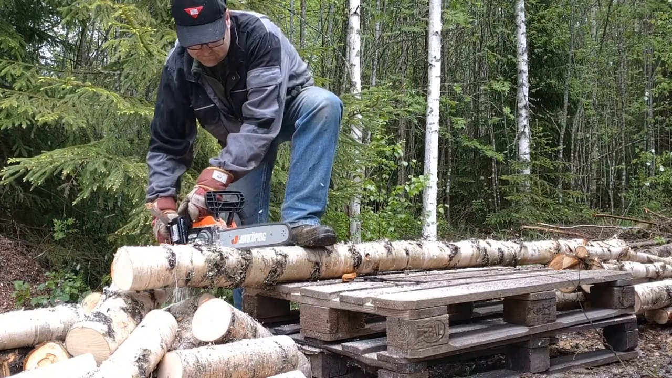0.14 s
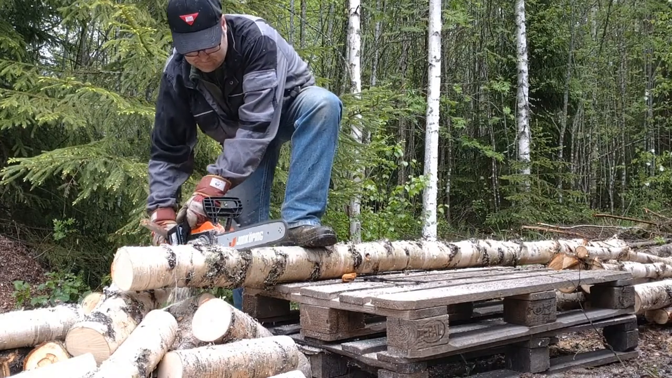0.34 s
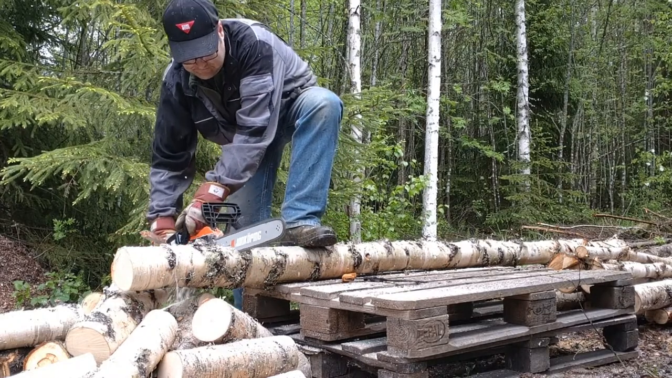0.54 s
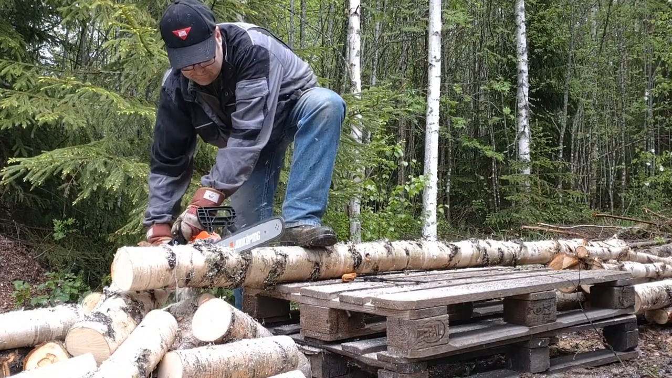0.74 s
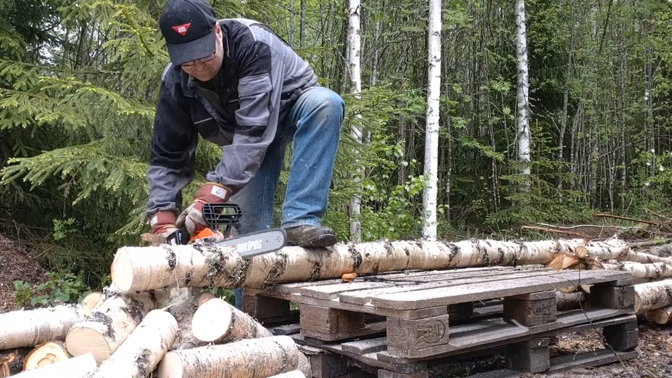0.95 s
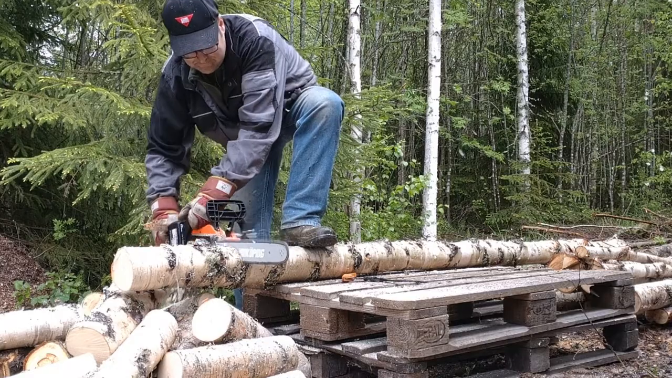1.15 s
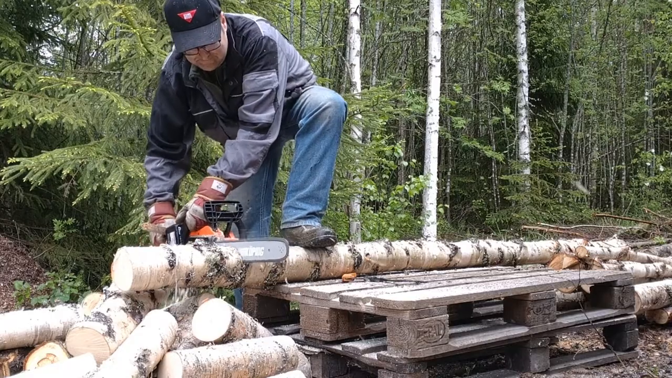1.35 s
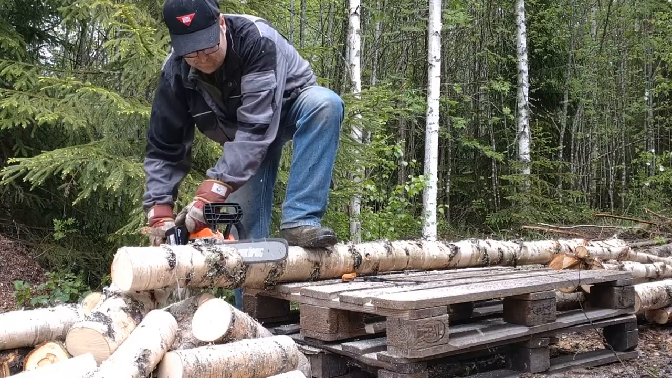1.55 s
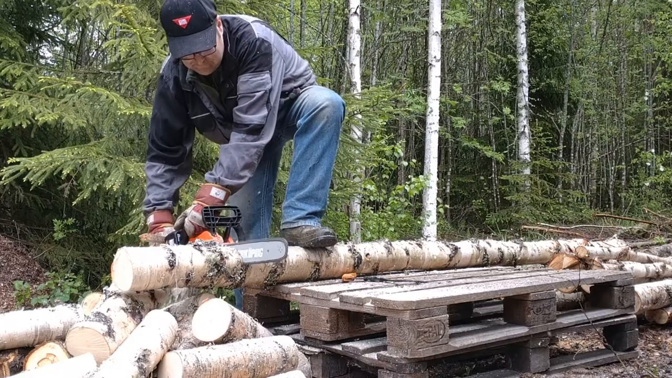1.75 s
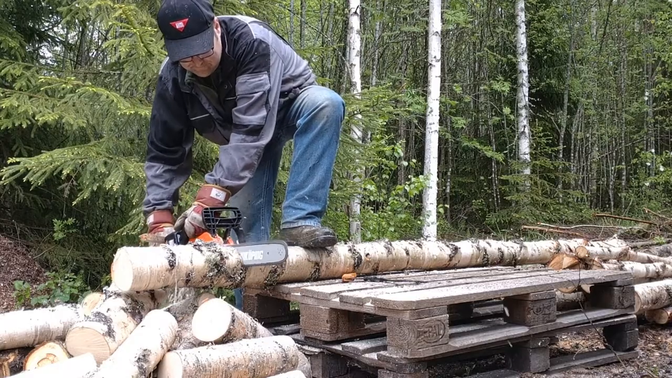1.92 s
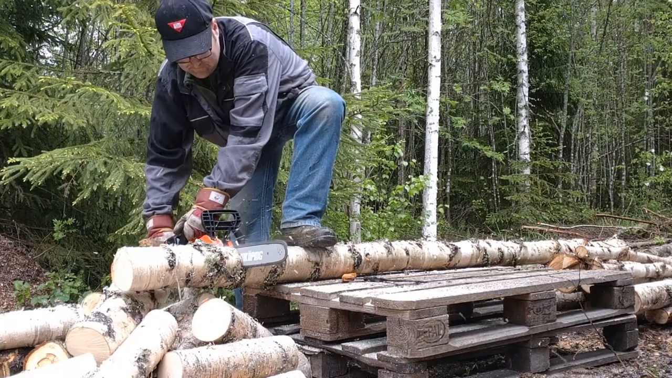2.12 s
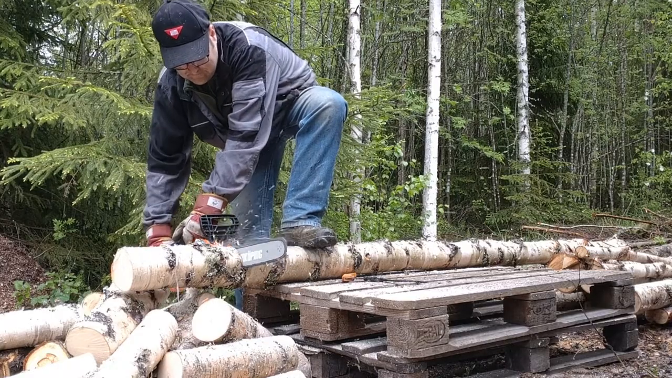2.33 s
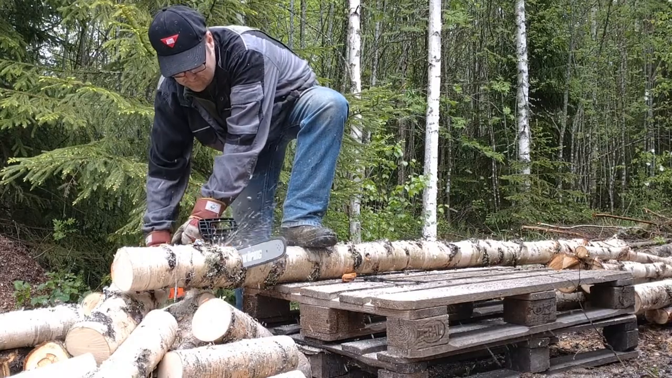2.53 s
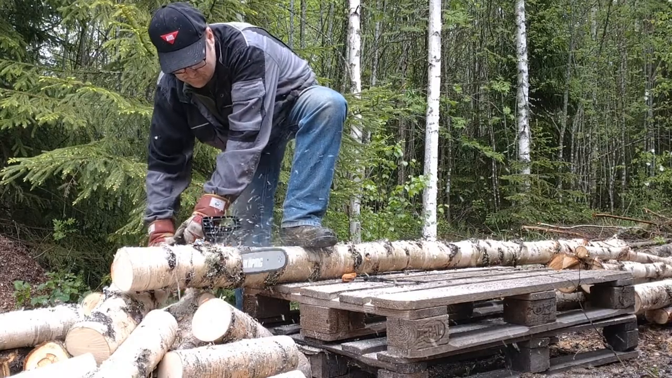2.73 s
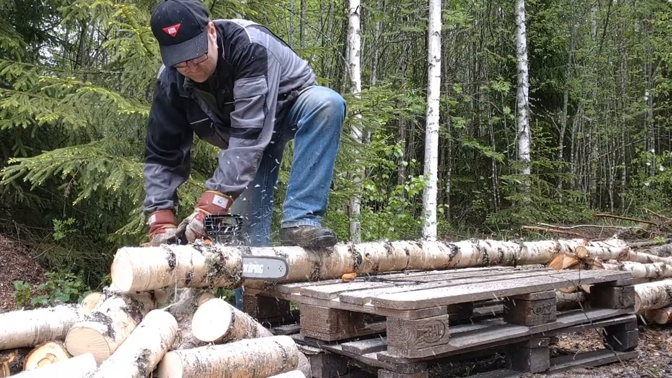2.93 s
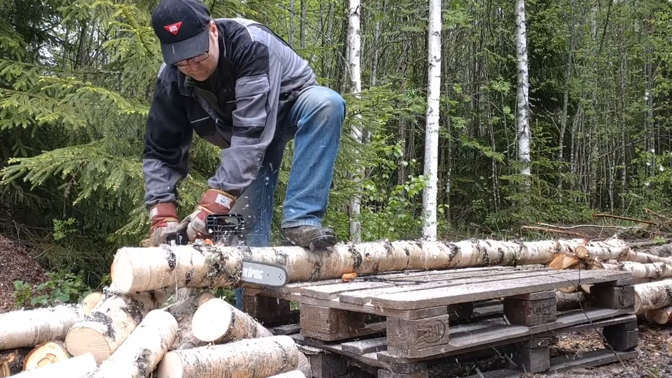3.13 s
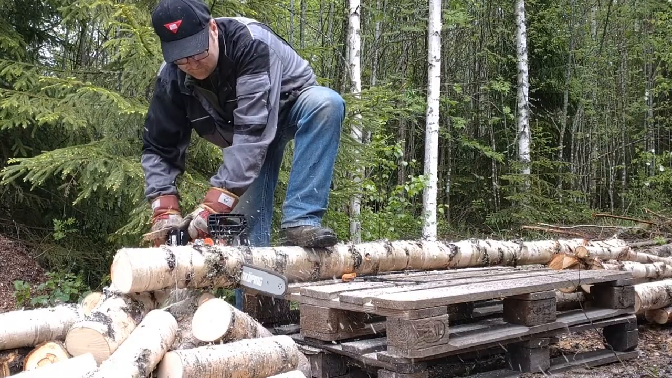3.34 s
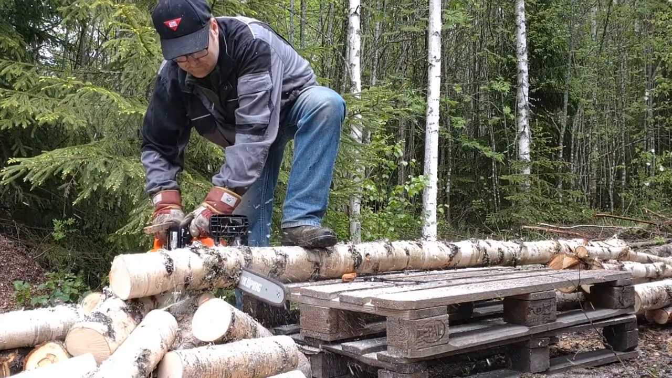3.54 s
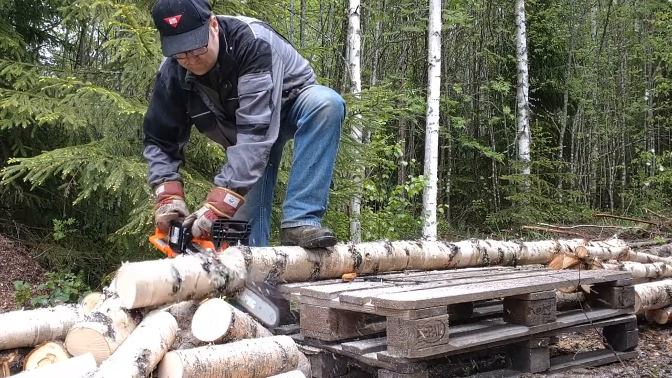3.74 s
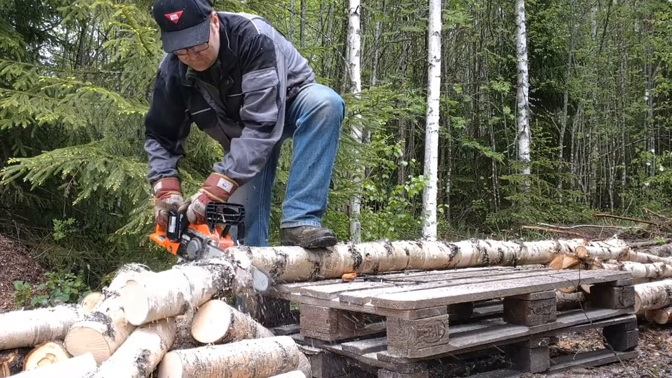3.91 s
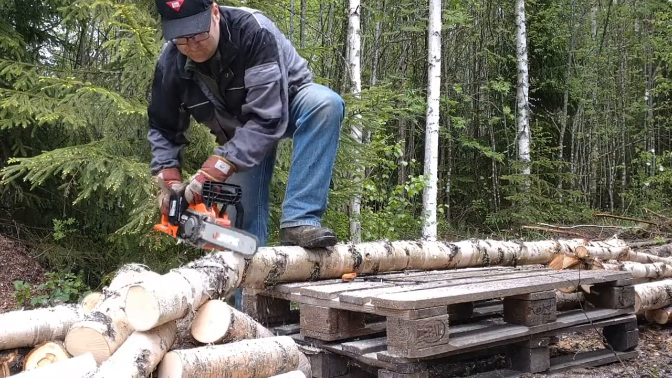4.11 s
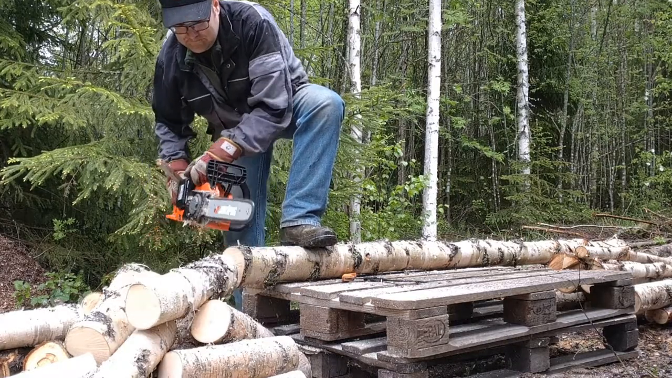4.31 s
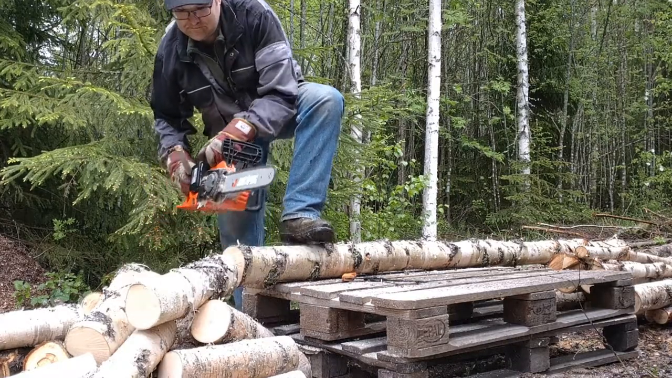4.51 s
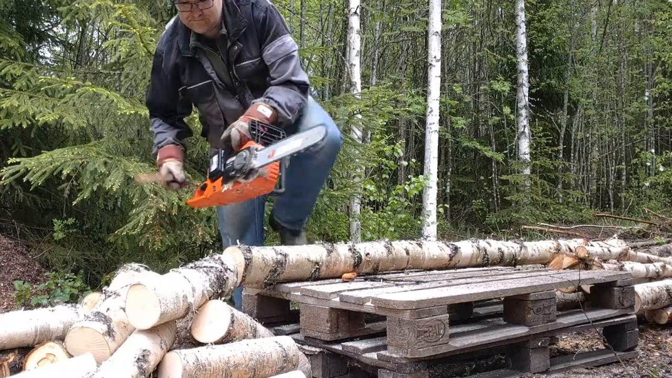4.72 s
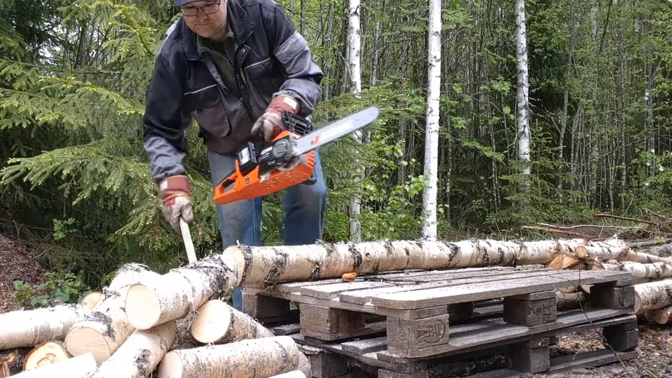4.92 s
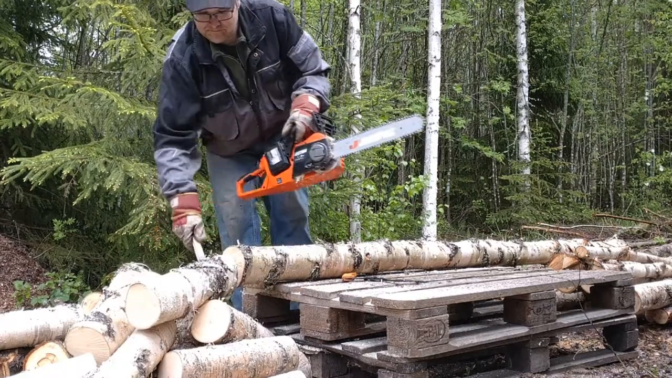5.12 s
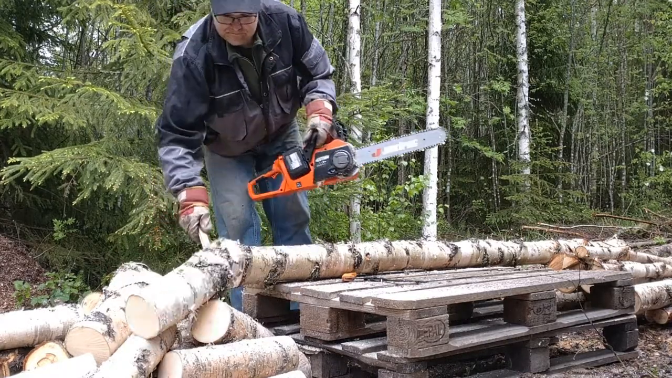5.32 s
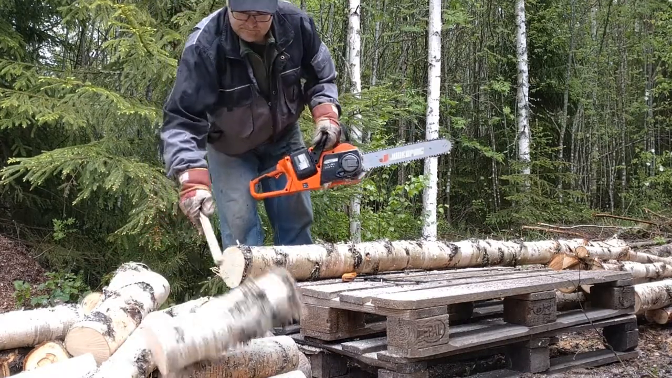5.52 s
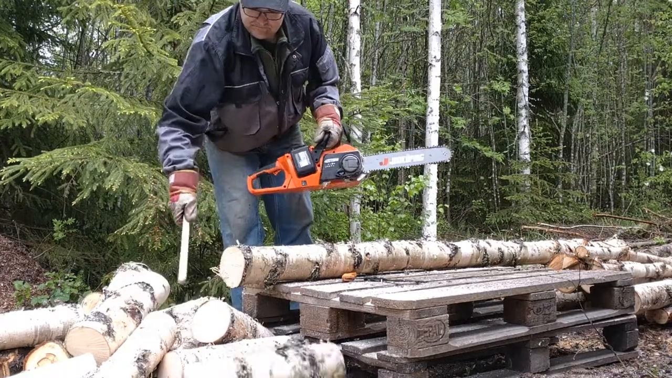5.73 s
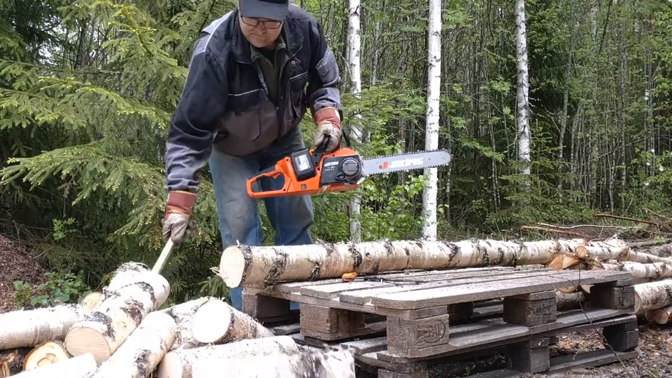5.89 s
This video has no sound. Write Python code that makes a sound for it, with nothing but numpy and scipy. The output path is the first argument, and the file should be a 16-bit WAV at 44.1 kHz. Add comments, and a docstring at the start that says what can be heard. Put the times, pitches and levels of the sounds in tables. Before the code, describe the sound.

Outdoors in a wood, leaves rustle softly and steadily with barely audible low puffs of air. From the first instant a cordless chainsaw cuts a birch log a few metres away, slightly left: a buzzing, singing chain tone with bright hiss, metallic bar rattle and rasping cutters. Around 0.9 s it bogs down, the pitch sliding to a low growl near 1.2 s with hollow booming from the log, then surging back by 1.5 s. It cuts steadily, dipping mildly around 2.9 s, rising towards 3.8 s. At about 3.95 s light wooden knocks mark the piece giving way. The freed chain coasts down in a falling whir with a narrow metallic ring, halting near 4.87 s with a crisp double clack. Quiet rustling remains, with tiny bark ticks and soft bumps. At 5.76 s the cut piece lands: a loud, hollow double knock, smaller rattling contacts, then leaves and a last faint tick.

```python
"""Leaves rustle in a wood, over faint puffs of air, while a cordless chainsaw cuts a birch log a few metres away.
The drive links strike the sprocket and sing a gliding tone; chain, bar and log add noise pulsed by the chain.
The saw stalls briefly, finishes the cut amid light wooden knocks, coasts down and halts with a double clack.
Small ticks and bumps of bark and logs follow, and the cut piece is tipped onto the pile: ringing wooden knocks.
"""
import sys
import numpy as np
from scipy import signal
from scipy.fft import rfft, irfft, next_fast_len
from scipy.io import wavfile
from scipy.ndimage import uniform_filter1d

SR = 44100
rng = np.random.default_rng(int(sys.argv[2]) if len(sys.argv) > 2 else 0)


def pcm_store(signal):
    """Save signal as 16-bit PCM."""
    levels = np.round(np.clip(np.atleast_2d(signal), -1, 1) * 32767)
    wavfile.write(sys.argv[1], SR, levels.astype(np.int16).T)


N = 267236


def undb(db):
    """Turn decibels into a gain."""
    return 10 ** (np.asarray(db) / 20)


def unit(x):
    """Scale to an average (rms) level of 1."""
    return x / np.sqrt(np.mean(x ** 2))


def curves(table):
    """Join the points of a time table with straight lines; one curve for each column after the time."""
    seconds, *columns = np.transpose(table)
    return [np.interp(np.arange(N) / SR, seconds, column) for column in columns]


def over_hz(table):
    """Read a (frequency in Hz, value) table at every frequency of the spectrum."""
    hz, value = np.transpose(table)
    bins = np.arange(next_fast_len(N) // 2 + 1) * SR / next_fast_len(N)
    return np.interp(np.log(bins + 1), np.log(hz), value)


def colour(x, gain):
    """Weigh the frequencies of x."""
    spectrum = rfft(x, next_fast_len(N)) * gain
    return irfft(spectrum, next_fast_len(N))[..., :N]


def walk(rate):
    """Smoothly wandering random curve of rms 1, with `rate` new values a second."""
    step = int(SR / rate)
    held = np.repeat(rng.standard_normal(N // step + 1), step)
    smooth = uniform_filter1d(uniform_filter1d(held, step), step)
    return unit(smooth[:N])


def mode(hz, width):
    """Spectrum of one resonance, a peak `width` Hz wide: rows of frequency in Hz and relative level in dB."""
    away = np.array([-24, -4, -2, -1, 0, 1, 2, 4, 24])  # distance from the peak in half widths
    level_db = -15 * np.log10(1 + away ** 2 + (away / 5) ** 6)
    return np.transpose([hz * np.exp(away * width / 2 / hz), level_db])


def pair(envelope, spectrum, likeness, balance):
    """Noise at two microphone ports: a shared part that reaches the right one later, and a part for each."""
    right_lag_s = 0.08e-3
    alike = np.clip(over_hz(likeness), 0, 1)
    lean_db = over_hz(balance) / 2
    shared, left, right = envelope * rng.standard_normal((3, N))
    hz = np.arange(len(alike)) * SR / next_fast_len(N)
    delay = np.exp(-2j * np.pi * hz * right_lag_s)
    tone = undb(over_hz(spectrum))
    sides = np.array([undb(lean_db), undb(-lean_db) * delay])
    both = colour(shared, tone * np.sqrt(alike) * sides)
    own = colour(np.array([left, right]), tone * np.sqrt(1 - alike) * undb([lean_db, -lean_db]))
    return unit(both + own)


def add(out, s, sound):
    """Mix a short stereo sound in at s seconds."""
    i = int(s * SR)
    out[:, i:i + sound.shape[1]] += sound[:, :N - i]


def leaves():
    """A steady rustle with a quick flicker is filtered noise; slower swings shape low puffs of air at the ports."""
    # Colour of the rustle. Each row: frequency in Hz, relative level per Hz in dB.
    rustle_colour = [(18, -75), (30, -52), (90, -36), (170, -30), (280, -18.5), (384, -6.5), (600, -2),
                     (950, -0.5), (1500, -8.5), (2120, -6), (2830, -10), (4080, -12.5), (9000, -19.5),
                     (16000, -26)]
    # Colour of the faint low puffs. Each row: frequency in Hz, relative level per Hz in dB.
    puff_colour = [(15, -20), (40, -11), (90, -1), (160, -2), (300, -50)]
    # How alike the two sides are. Each row: frequency in Hz, share from 0 to 1 (less than 0 counts as 0).
    likeness = [(60, 0.5), (130, 0.5), (290, 0.77), (640, 0.55), (1410, -0.23), (3100, 0.02), (6820, 0.04),
                (15000, 0)]
    # Lean to one side. Each row: frequency in Hz, left minus right in dB.
    balance = [(60, 6), (110, -4), (200, 3), (380, -2), (700, 1), (1290, -3), (2380, -3.0), (4400, -1.5),
               (8120, 0), (15000, -8)]
    rustle_db, puffs_db, puff_swing_db = -49.5, -97, 5.0
    flicker = undb(0.3 * walk(12) + 0.8 * walk(60))
    puffs = undb(puffs_db + puff_swing_db * walk(13)) * pair(1, puff_colour, likeness, balance)
    return undb(rustle_db) * pair(flicker, rustle_colour, likeness, balance) + puffs


def ticks():
    """Each tick or bump is a burst of noise around one frequency that dies away at once."""
    # Double clack of the halting chain. Each row: start in seconds, starting level in dB,
    # centre in Hz, decay in ms.
    clacks = [(4.8665, -39, 1400, 2.5), (4.8665, -40, 3000, 2), (4.8665, -42, 7500, 2.5),
              (4.8702, -38, 1300, 3.5), (4.8702, -40, 2800, 3)]
    # Small ticks and soft bumps of bark and logs. Each row: start in seconds, starting level in dB,
    # centre in Hz, decay in ms.
    bumps = [(4.964, -60, 7100, 2.8), (5.17, -57, 12000, 3), (5.245, -54, 12000, 3), (5.545, -60, 11000, 3),
             (5.64, -58, 200, 14), (5.71, -62, 8000, 3), (5.872, -58, 130, 7), (6.035, -53, 9000, 3)]
    out, t = np.zeros((2, N)), np.arange(SR // 20) / SR
    for s, level_db, hz, decay_ms in clacks + bumps:
        band = signal.butter(2, [0.5 * hz, min(1.16 * hz, 0.45 * SR)], "band", fs=SR, output="sos")
        noise = rng.standard_normal(len(t)) + 0.41 * rng.standard_normal((2, len(t)))  # shared, then own part
        burst = unit(signal.sosfilt(band, noise))
        add(out, s, undb(level_db) * burst * np.exp(-t * 1000 / decay_ms))
    return out


def knocks():
    """Wood hits wood: a push grows over the contact time and rings the log; a short crack rides on the attack."""
    # Each row: start in seconds, peak of the ringing in dB, crack relative to it in dB, contact time in ms,
    # pitch as a multiple of the notes below, left minus right in dB.
    hits = [(3.948, -35, -15, 1.14, 1.2, 10), (3.964, -36, -10, 1.32, 0.92, 16),
            (3.98, -32, -13, 1.1, 1.4, 10), (5.757, -14, -8.5, 6, 1.03, 1.5),
            (5.768, -18.5, -14, 3.9, 1.21, -6), (5.779, -34, -25, 2.6, 1.19, -8),
            (5.786, -37, -18, 2.5, 1.2, -8), (5.802, -41, -9, 3.2, 0.77, 4)]
    # Notes of a struck log. Each row: frequency in Hz, relative level in dB, seconds to fade by 60 dB.
    notes = [(117, -17, 0.051), (311, -9, 0.069), (485, 16.5, 0.02), (588, -12, 0.11), (393, -19, 0.016),
             (950, -1, 0.02), (2170, -15, 0.022), (3580, -10, 0.023), (5410, -22, 0.029), (6550, -28, .025),
             (7550, -42, .02)]
    out, t = np.zeros((2, N)), np.arange(SR // 5) / SR
    bright = signal.butter(2, [1400, 9500], "band", fs=SR, output="sos")
    thin = signal.butter(1, 200, "high", fs=SR, output="sos")  # the knocks carry little bass
    for s, peak_db, crack_db, contact_ms, pitch, pan_db in hits:
        push = np.sin(np.pi / 2 * np.minimum(t * 1000 / contact_ms, 1)) ** 2
        ring = sum(undb(db) * np.sin(2 * np.pi * pitch * hz * t) * np.exp(-np.log(1000) * t / t60)
                   for hz, db, t60 in notes)
        body = signal.sosfilt(thin, push * ring)
        body = body / np.abs(body).max()
        noise = rng.standard_normal(len(t)) + 1.7 * rng.standard_normal((2, len(t)))
        crack = undb(crack_db) * np.sqrt(push) * np.exp(-t / 0.0037) * signal.sosfilt(bright, noise)
        add(out, s, undb(peak_db + np.array([[pan_db], [-pan_db]]) / 2) * (body + crack))
    return out


def strikes(turns, scatter_db, sharp, floor):
    """Loudness of repeated strikes: at each whole turn a burst of random size, dying away over a steady floor."""
    size = undb(scatter_db * rng.standard_normal(N // 20))
    return unit(floor + size[turns.astype(int)] * np.exp(-sharp * (turns % 1)))


def saw_noise(beat, spectrum, level_db):
    """One noise of the saw, pulsed by the beat of the chain."""
    # How alike the two sides are. Each row: frequency in Hz, share from 0 to 1.
    likeness = [(60, 0.3), (250, 0.7), (600, 0.59), (1200, 0.49), (2500, 0.72), (5000, 0.35), (10000, 0)]
    # Lean to one side. Each row: frequency in Hz, left minus right in dB.
    balance = [(60, -8), (200, 6), (380, -1.5), (700, -1.5), (1290, -2.5), (2380, -5.5), (4400, -4),
               (8120, -0.5), (15000, -8.5)]
    return undb(level_db) * pair(beat, spectrum, likeness, balance)


def link_tone(turns):
    """Links seat evenly, every second one a little harder: sines at multiples and half of the link rate."""
    # Multiples of the link rate that sound.
    orders = (.5, 1, 2, 3, 5)
    # How far the phase of each of them wanders, in radians.
    wander_rad = (1., .4, .45, .85, .5)
    # They swell and fade as they glide through resonances of saw and log.
    # Each row: time in seconds, levels in dB of the half order and of orders 1, 2 and 3.
    order_levels = [(0.03, -57, -42, -32, -49), (0.2, -55, -44, -37, -48), (0.4, -60, -51, -35, -44),
                    (0.55, -65, -51, -41, -44), (0.7, -58, -45, -51, -40), (0.86, -67, -45, -52, -40),
                    (0.9, -55, -56, -35, -49), (0.96, -52, -56, -36, -57), (1.02, -48, -43, -38, -47),
                    (1.07, -53, -45, -38, -51), (1.12, -60, -40, -45, -44), (1.17, -59, -43, -50, -42),
                    (1.22, -68, -56, -50, -54), (1.27, -74, -59, -60, -59), (1.32, -74, -53, -51, -46),
                    (1.39, -68, -45, -50, -52), (1.42, -61, -49, -37, -48), (1.46, -57, -48, -34, -48),
                    (1.48, -56, -45, -37, -49), (1.5, -54, -40, -52, -48), (1.6, -47, -36, -47, -47),
                    (1.75, -52, -39, -45, -52), (1.9, -56, -50, -48, -39), (2.1, -53, -54, -53, -40),
                    (2.22, -51, -42, -61, -45), (2.4, -50, -46, -49, -40), (2.6, -52, -48, -55, -48),
                    (2.72, -57, -46, -38, -49), (2.85, -49, -42, -36, -48), (3, -52, -46, -35, -54),
                    (3.1, -48, -45, -39, -46), (3.22, -46, -44, -42, -45), (3.4, -56, -48, -41, -52),
                    (3.52, -56, -43, -45, -42), (3.65, -54, -37, -51, -50), (3.8, -52, -34, -50, -56),
                    (3.93, -56, -33, -58, -58), (3.955, -54, -42, -42, -56), (3.975, -58, -42, -38, -60),
                    (4, -62, -60, -40, -62), (4.05, -70, -62, -41, -64), (4.09, -75, -60, -44, -54),
                    (4.12, -80, -42, -41, -45), (4.17, -85, -43, -43, -45), (4.2, -90, -56, -46, -44),
                    (4.225, -90, -42, -62, -40), (4.28, -90, -40, -60, -38), (4.31, -90, -42, -42, -38),
                    (4.35, -90, -47, -42, -45), (4.39, -90, -62, -43, -44), (4.43, -90, -62, -49, -44),
                    (4.46, -90, -50, -51, -44), (4.5, -90, -52, -50, -55), (4.53, -90, -56, -41, -54),
                    (4.555, -90, -62, -58, -56), (4.6, -90, -70, -56, -56), (4.63, -90, -75, -46, -53),
                    (4.66, -90, -80, -46, -55), (4.69, -90, -85, -64, -64), (4.74, -90, -90, -55, -68),
                    (4.79, -90, -90, -60, -70), (4.84, -90, -90, -72, -72)]
    # A fifth order sings faintly as the motor pulls out of the stall. Each row: time in seconds, level in dB.
    fifth_level = [(0.0, -80), (1.24, -70), (1.28, -47), (1.31, -41), (1.34, -42), (1.365, -60), (1.4, -80),
                   (6.0, -80)]
    out = np.zeros((2, N))
    for order, wander, db in zip(orders, wander_rad, curves(order_levels) + curves(fifth_level)):
        phase = 2 * np.pi * order * turns + wander * walk(60)
        right_lag_rad = np.array([[0], [0.27 * order]])
        out += np.sqrt(2) * undb(db + 2.2 * walk(24)) * np.sin(phase - right_lag_rad)
    return out


def chain_noise(beat, effort_db, slow):
    """Chain and chips hiss, the bar rattles, the cutters rasp and a bright edge sizzles, all rising with effort."""
    # Colours of the four noises. Each row: frequency in Hz, relative level per Hz in dB.
    hiss_colour = [(3180, -54), (5400, -2.5), (5900, -4), (7300, -2.5), (8720, 1), (10200, -8.5),
                   (13300, -49), (22000, -120)]
    bar_colour = [(380, -48.5), (650, -11), (800, -11.5), (900, -5), (1110, -6), (1400, -1), (1800, -7.5),
                  (2150, -6), (2600, -2), (3100, -6.5), (5000, -67)]
    rasp_colour = [(2000, -56), (3000, -9.5), (3400, -2.5), (3950, 1), (4400, -2.5), (4900, 0),
                   (5500, -17.5), (8000, -80)]
    edge_colour = [(6500, -47), (9300, -8), (10100, 4), (11400, 5.5), (14000, 9), (15700, 10), (17000, -6)]
    # Bar, rasp and edge in turn. Each row: level at full effort in dB, dB gained per dB of effort.
    # The edge also changes with the speed of the chain.
    followers = [(-32.5, 1.27), (-30, 1.56), (-24, 0.87)]
    slow_hiss_db, slow_edge_db = -1.2, -1.4  # for each octave that the chain slows
    bar_db, rasp_db, edge_db = (db + share * (effort_db - FULL_DB) for db, share in followers)
    hiss_db = effort_db + slow_hiss_db * slow
    edge_db = edge_db + slow_edge_db * slow
    return (saw_noise(beat, bar_colour, bar_db + 0.2 * walk(33.6))
            + saw_noise(beat, rasp_colour, rasp_db + 0.64 * walk(24.61))
            + saw_noise(beat, hiss_colour, hiss_db + 0.5 * walk(12))
            + saw_noise(beat, edge_colour, edge_db + 0.5 * walk(16)))


def rattle(beat, effort_db, slow):
    """The links shake resonances of bar and casing, whose levels follow effort and chain speed."""
    # Each row: frequency in Hz, width in Hz, level at full effort and speed in dB,
    # dB gained per octave that the chain slows.
    resonances = [(724, 103, -54.5, 7.5), (1236, 310, -44, 5.5), (1896, 270, -48.5, 3.5),
                  (3420, 200, -54.5, 7.5), (3730, 230, -52, 3), (4660, 1100, -48, 5.5),
                  (6680, 470, -39, -2), (9100, 770, -37, -6)]
    effort_share, patchy_db = 0.69, 2.0
    out = 0
    for hz, width, db, gain_db in resonances:
        level_db = db + gain_db * np.minimum(slow, 1.4)  # slowing counts up to 1.4 octaves
        level_db = level_db + effort_share * (effort_db - FULL_DB) + patchy_db * walk(22)
        out = out + saw_noise(beat, mode(hz, width), level_db)
    return out


def bar_ring(beat):
    """The free chain rings the bar in a narrow band as it coasts."""
    # Each row: frequency in Hz, relative level per Hz in dB.
    ring_colour = [(2000, -64), (2480, -9), (2600, -2), (2720, -21), (3300, -57)]
    full_s, rise_s, hold_s = 4.27, 0.19, 0.11  # time of full level, rise before it, hold after it
    full_db, fade_db_per_s = -34.5, 116
    t = np.arange(N) / SR
    rise = np.clip(1 + (t - full_s) / rise_s, 1e-3, 1) ** 2
    fade_db = fade_db_per_s * np.maximum(t - full_s - hold_s, 0)
    return saw_noise(beat, ring_colour, full_db + 20 * np.log10(rise) - fade_db)


def log_drum(beat):
    """Cutters drum the log: a broad rumble, and two hollow notes that boom when the cutters catch."""
    # Colour of the rumble. Each row: frequency in Hz, relative level per Hz in dB.
    rumble_colour = [(24, -85), (60, -47), (120, -38), (194, -28.5), (280, -14.5), (345, -9), (395, -12.5),
                     (456, -1), (640, -5.5), (800, -7.5), (1040, -3.5), (1760, -120)]
    # Louder while the chain bogs down. Each row: time in seconds, level in dB.
    rumble_level = [(0.0, -53), (0.2, -45.5), (0.7, -44.5), (1.03, -38.5), (1.2, -41), (1.27, -40),
                    (1.31, -38.5), (1.37, -36.5), (1.45, -46.5), (2.5, -44), (2.9, -42.5), (3.3, -41.5),
                    (3.52, -47.5), (3.76, -46), (3.9, -50.5), (4.14, -49.5), (4.67, -53), (4.8, -51),
                    (4.9, -61)]
    # The upper and the lower hollow note. Each row: frequency in Hz, width in Hz.
    hollow_notes = [(456.5, 11), (346.6, 24)]
    # Each row: time in seconds, level of the upper note in dB, level of the lower note in dB.
    boom_levels = [(0.0, -62, -60), (0.3, -54, -59), (0.9, -54, -57), (1.03, -48, -43.5),
                   (1.13, -36.5, -46), (1.2, -60, -53), (1.3, -39.5, -54), (1.37, -38.5, -45.5),
                   (1.46, -71, -62), (1.66, -46, -64), (1.75, -64, -55.5), (2.5, -51, -61.5),
                   (2.88, -56, -54), (3.1, -55, -53), (3.66, -64, -55.5), (3.74, -44, -67),
                   (3.84, -64, -61), (3.97, -53, -54), (4.1, -57.5, -69), (4.901, -78, -85)]
    (rumble_db,) = curves(rumble_level)
    out = saw_noise(beat, rumble_colour, rumble_db + 1.6 * walk(11))
    for (hz, width), boom_db in zip(hollow_notes, curves(boom_levels)):
        out = out + saw_noise(beat, mode(hz, width), boom_db)
    return out


FULL_DB = -26  # hiss level that counts as full effort


def saw():
    """One chain speed drives the tone of the links and all noises; a cutter follows every fourth link."""
    # Cut, stall, cut and coast. Each row: time in seconds, drive links per second.
    chain_speed = [(0.0, 724.5), (0.32, 782), (0.45, 788.4), (0.57, 817), (0.7, 823.6), (0.85, 825.5),
                   (0.96, 742), (1.066, 611), (1.132, 473.5), (1.23, 296.5), (1.28, 360.3), (1.31, 385.4),
                   (1.345, 415), (1.38, 485), (1.416, 592), (1.445, 725), (1.472, 790), (1.505, 880),
                   (1.57, 927), (1.7, 889.5), (1.8, 867), (1.92, 856), (2.0, 859), (2.14, 857.4),
                   (2.2, 870), (2.45, 851), (2.67, 821), (2.77, 745), (2.86, 708.5), (2.98, 746),
                   (3.12, 829), (3.2, 836), (3.39, 795), (3.5, 847), (3.6, 862), (3.81, 943), (3.9, 935),
                   (3.93, 892), (3.96, 754.5), (4.0, 677.5), (4.07, 605), (4.2, 498), (4.39, 360.6),
                   (4.53, 288.6), (4.67, 210), (4.8, 140.8), (4.86, 110)]
    # How hard the chain works. Each row: time in seconds, level of the hiss at full speed in dB.
    chain_effort = [(0.0, -27), (0.1, -25.5), (0.51, -26), (0.65, -27.5), (0.72, -26), (1.03, -25.5),
                    (1.2, -28.5), (1.25, -31.5), (1.34, -28), (1.43, -24), (1.6, -26), (1.76, -25),
                    (2.1, -26), (2.54, -25.5), (2.82, -26), (3.07, -24.5), (3.289, -25.5), (3.52, -25.5),
                    (3.769, -26), (3.9, -28), (3.931, -25.5), (3.956, -24.5), (3.98, -28.5), (4.06, -30),
                    (4.14, -28.5), (4.4, -29.5), (4.55, -33), (4.669, -34.5), (4.74, -37.5), (4.8, -39.5),
                    (4.874, -43), (4.899, -62)]
    # The saw swings across the view. Each row: time in seconds, left minus right in dB.
    swing = [(0.0, 4), (0.2, 9), (0.65, 7), (1.2, 6), (1.34, 3), (1.5, 9), (2.1, 6), (2.54, 8), (2.82, 5.5),
             (3.2, 8), (3.6, 6.5), (3.95, 9), (4.06, 6.5), (4.4, 2.5), (4.9, 1)]
    full_speed_hz, stop_s, stop_fade_s, start_fade_s = 855, 4.92, 0.051, 0.00063
    t = np.arange(N) / SR
    (hz,), (effort_db,), (pan_db,) = map(curves, (chain_speed, chain_effort, swing))
    slow = np.log2(full_speed_hz / hz)  # octaves below full speed
    turns = np.cumsum(hz * (1 + 0.002 * walk(25))) / SR  # links passed so far
    judder = undb(0.65 * walk(40))  # the bar chatters in the kerf
    links = strikes(turns, scatter_db=0.0, sharp=0.69, floor=0.63)
    cutters = strikes(turns / 4, scatter_db=1.0, sharp=0.29, floor=0.81)
    beat = links * cutters * judder
    noise = chain_noise(beat, effort_db, slow) + rattle(beat, effort_db, slow)
    noise = noise + bar_ring(links * judder) + log_drum(cutters * judder)
    running = np.clip(np.minimum((stop_s - t) / stop_fade_s, t / start_fade_s), 0, 1)
    return running * undb([pan_db / 2, -pan_db / 2]) * (noise + link_tone(turns))


def scene():
    """Everything that reaches the two ports."""
    return leaves() + ticks() + knocks() + saw()


def record(dry):
    """The camera cuts the highest treble steeply, above 15680 Hz."""
    return signal.sosfilt(signal.ellip(10, 0.2, 75, 15680, fs=SR, output="sos"), dry)


dry = scene()
out = record(dry)
pcm_store(out)
```